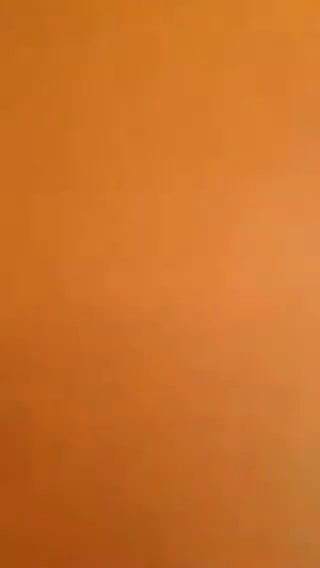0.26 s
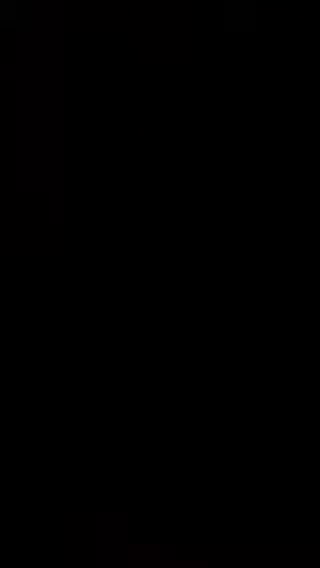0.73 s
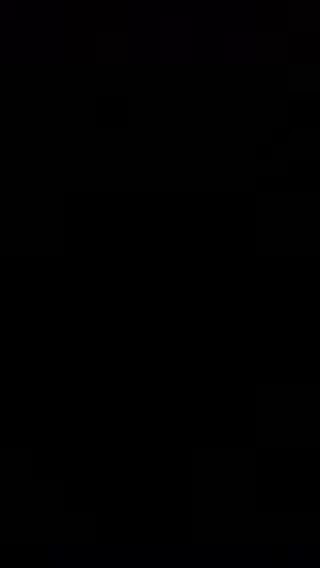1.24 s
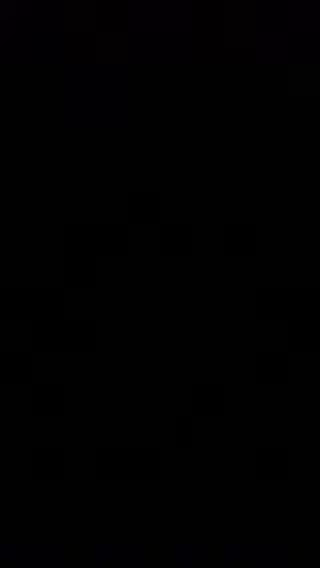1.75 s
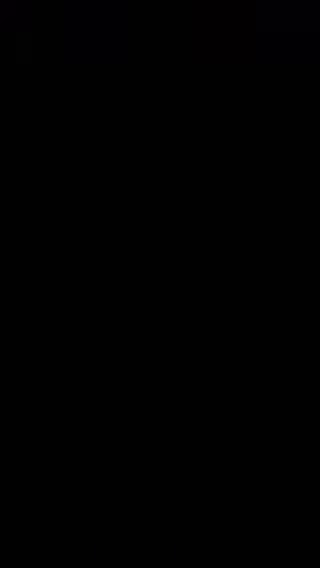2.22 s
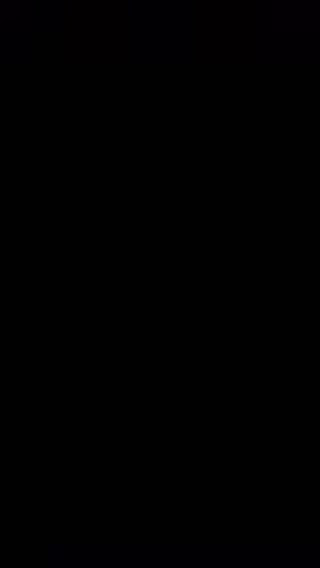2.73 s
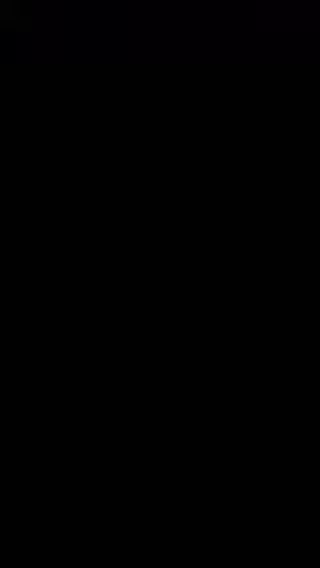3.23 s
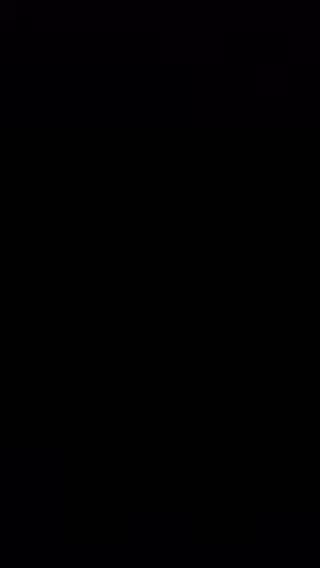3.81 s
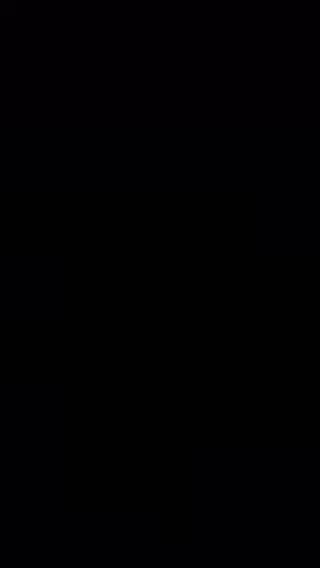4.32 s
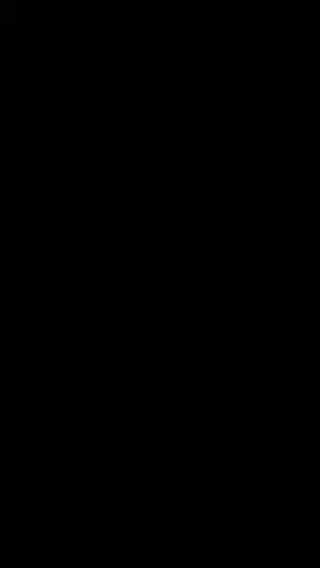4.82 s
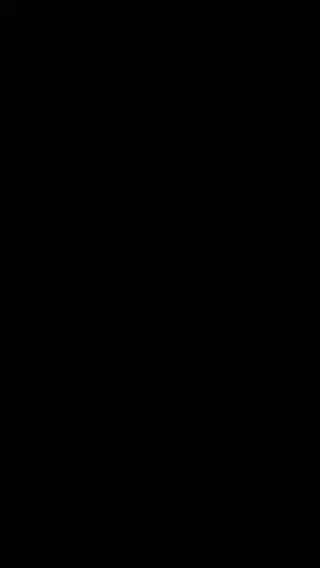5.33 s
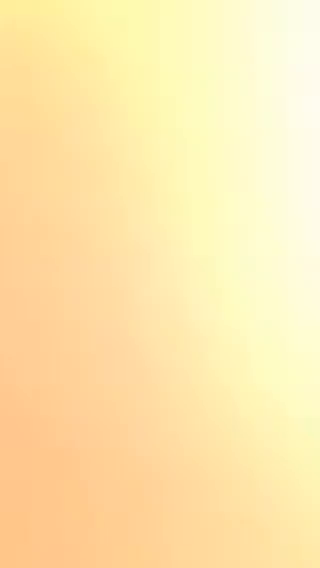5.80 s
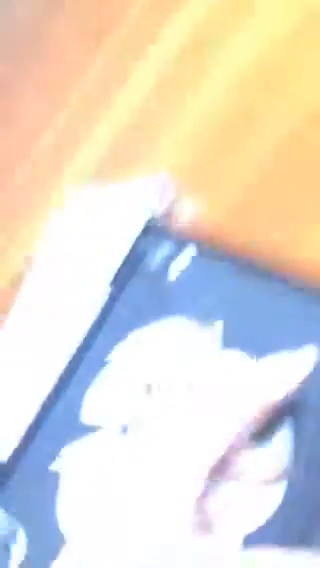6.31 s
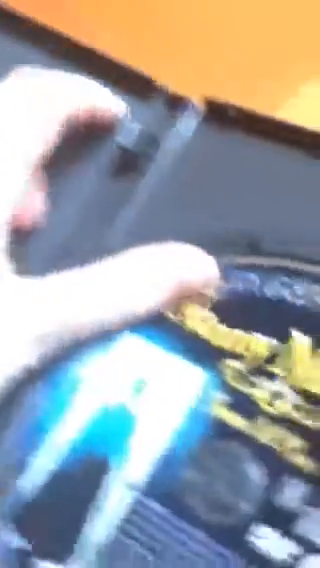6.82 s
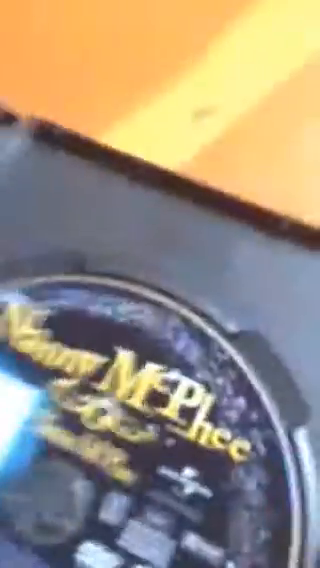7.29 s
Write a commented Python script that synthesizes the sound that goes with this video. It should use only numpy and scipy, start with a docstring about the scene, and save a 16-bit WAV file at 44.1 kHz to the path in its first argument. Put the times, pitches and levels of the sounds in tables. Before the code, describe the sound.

Very close to the microphone in a small, dry room, hands work at a thin plastic case on a wooden table. Two hard snaps come early, then crackling sleeve and lid knocks, a short edge squeak, and a loud pop followed by busy clatter. A dull grip rumble near the end leads into faint rustling and tiny clicks.

```python
"""In a small room a phone is laid face down on a wooden table; hands wrestle a thin plastic case open.
Lids knock and clasps snap (noise bursts into damped modes), the sleeve crackles, fingers drag over
plastic and wood (grainy noise), a lid edge squeals; then the phone is picked up again (dull rumble).
The room answers with fading noise tails; the microphone hisses and drops the deep bass."""
import sys
import numpy as np
from scipy import signal
from scipy.fft import rfft, irfft, next_fast_len
from scipy.io import wavfile
from scipy.ndimage import uniform_filter1d

SR = 44100
rng = np.random.default_rng(int(sys.argv[2]) if len(sys.argv) > 2 else 0)


def dump(signal):
    """Clip the signal to [-1, 1] and save it as 16-bit WAV at the path in sys.argv[1]."""
    limited = np.clip(np.atleast_2d(signal).T, -1, 1)
    pcm = np.round(limited * 32767).astype(np.int16)
    wavfile.write(sys.argv[1], SR, pcm)


N = 332955


def amp(db):
    """Decibels to amplitude."""
    return 10 ** (np.asarray(db) / 20)


def unit(x):
    """Scale to RMS 1."""
    return x / np.sqrt(np.mean(x ** 2) + 1e-20)


def peak(x):
    """Scale to peak 1."""
    return x / np.max(np.abs(x))


def along(points, hz):
    """Interpolate (f/Hz, value) points on a log frequency axis."""
    f, v = np.transpose(points)
    return np.interp(np.log(hz + 1), np.log(f + 1), v)


def filtered(x, response):
    """Apply a complex response of frequency, zero-padded."""
    m = next_fast_len(x.shape[-1] + 8192)
    spectrum = rfft(x, m) * response(np.fft.rfftfreq(m, 1 / SR))
    return irfft(spectrum, m)[..., :x.shape[-1]]


def modes(table, scatter_db=0):
    """Causal response of damped modes of alternating sign; scatter_db varies their gains per call."""
    gains = amp(scatter_db * rng.standard_normal(len(table)))

    def response(f):
        total = 0
        for k, (gain, (centre, width, db)) in enumerate(zip(gains, table)):
            resonance = 1j * f * width / (centre * centre - f * f + 1j * f * width)
            total = total + (-1) ** k * gain * amp(db) * resonance
        return total
    return response


def stick_slip(rate, spread_db):
    """Friction noise whose level wanders between uneven grains, rate per second."""
    knots = np.minimum(rng.exponential(size=int(N * rate / SR) + 4), 3.5)
    size_db = spread_db * np.interp(np.arange(N) * rate / SR, np.arange(len(knots)), knots)
    return rng.standard_normal(N) * amp(size_db)


def patchy(x, depth_db):
    """The colour shifts as the fingers move from spot to spot; RMS 1."""
    z = signal.stft(x, nperseg=256)[2]
    field = uniform_filter1d(rng.standard_normal(z.shape), size=6, axis=0)
    field = uniform_filter1d(field, size=12, axis=1)
    return unit(signal.istft(z * amp(depth_db * unit(field)), nperseg=256)[1][:N])


def held(rows, rise_db_per_s, fall_db_per_s):
    """Gains, one per level column: each row swells, holds and fades; rows add in power."""
    power, t = 1e-14, np.arange(0, N + 16, 16) / SR
    for s, length, *db in rows:
        before = rise_db_per_s * np.maximum(s - t, 0)
        after = fall_db_per_s * np.maximum(t - s - length, 0)
        power = power + np.outer(amp(db), amp(-before - after)) ** 2
    return np.array([np.interp(np.arange(N) / SR, t, gain) for gain in np.sqrt(power)])


# decay of the small room: f/Hz, t60/s
ROOM = [(150, 0.18), (600, 0.036), (3000, 0.022), (12000, 0.12)]


def room(x):
    """Noise tails, each frequency dying at its own speed; a new tail every third of a second."""
    out, step = np.zeros(N + SR), SR // 3
    for start in range(0, N, step):
        hz, t, z = signal.stft(rng.standard_normal(step), SR, nperseg=256)
        decay = amp(-60 * t / along(ROOM, hz)[:, None])
        tail = signal.istft(z * decay, SR, nperseg=256)[1]
        wet = signal.fftconvolve(x[start:start + step], tail / np.linalg.norm(tail))
        out[start + 220:][:len(wet)] += wet  # 5 ms delay
    return out[:N]


# phone gripped, laid down and picked up: t/s, held/s, level/dB
GRIP = [(.19, 0.068, -57), (5.812, 0.082, -43)]
GRIP_SLOPE_DB_PER_S = 1100


def grip():
    """Dull rumble: noise through the phone body's 140 Hz resonance, twice."""
    level, = held(GRIP, GRIP_SLOPE_DB_PER_S, GRIP_SLOPE_DB_PER_S)
    body = modes([(140.0, 81, 0)])
    return level * unit(filtered(rng.standard_normal(N), lambda hz: body(hz) ** 2))


STROKE_RISE_DB_PER_S, STROKE_FALL_DB_PER_S = 349, 247
# dry fingertips over the glossy sleeve: t/s, held/s, level/dB
SWISHES = [(0, 0.013, -64.5), (.96, 0.018, -68.5), (1.05, 0.027, -55.5), (1.82, 0.024, -70),
           (2.2, 0.05, -64), (2.46, 0.0384, -74.5), (2.99, 0.038, -63), (3.14, 0.028, -67),
           (3.41, 0.057, -57.5), (3.77, 0.088, -64.5), (4.26, 0.034, -63), (4.52, 0.42, -63.5),
           (4.93, 0.14, -54.5), (5.15, 0.087, -56.5), (5.54, 0.04, -67.5), (5.74, 0.07, -62.5),
           (5.88, 0.036, -63.5), (7.48, 0.1, -68)]
# swish spectrum: f/Hz, relative density/dB
SWISH = [(6000, -37.5), (9500, -11.5), (11500, 3), (15300, -2)]


def swish():
    """Fine, smooth friction: patchy treble noise."""
    level, = held(SWISHES, STROKE_RISE_DB_PER_S, STROKE_FALL_DB_PER_S)
    friction = filtered(rng.standard_normal(N), lambda hz: amp(along(SWISH, hz)))
    return level * patchy(friction, depth_db=-2.0)


# lid edge pushed along the table: t/s, held/s, level/dB
SQUEAL = [(3.757, 0.0606, -39.5)]
# edge resonances: f/Hz, width/Hz, relative level/dB
SQUEAL_MODES = [(670, 32, -5), (1182, 66, 5.5), (1590, 42, -8), (3037, 47, -3.5)]
SQUEAL_SLOPE_DB_PER_S = 895


def squeal():
    """Fast slips excite a few narrow resonances of the edge."""
    level, = held(SQUEAL, SQUEAL_SLOPE_DB_PER_S, SQUEAL_SLOPE_DB_PER_S)
    return level * unit(filtered(stick_slip(rate=200, spread_db=-3.0), modes(SQUEAL_MODES)))


# free span of the lids, changing with the grip: t/s, f/Hz
SPAN = [(.6, 342.3), (1.1, 563), (1.45, 422.5), (2.4, 398.6), (2.85, 345.6), (3.15, 306.7), (3.4, 303.7),
        (3.47, 499), (3.6, 388), (3.79, 648), (4.6, 436), (4.85, 546), (5.2, 495), (5.8, 257.5), (6.2, 405),
        (6.52, 606), (6.59, 782), (7.4, 253)]
SPAN_DB_PER_OCTAVE = 12


def favour(x):
    """Lid sound nearest the pitch of the free span dominates; short-term power is evened out."""
    hz, t, z = signal.stft(x, SR, nperseg=1024)
    span_hz = np.interp(t, *np.transpose(SPAN))
    octaves_away = np.abs(np.log2((hz[:, None] + 1) / span_hz))
    z = z * amp(-SPAN_DB_PER_OCTAVE * octaves_away)
    power = uniform_filter1d(np.sum(np.abs(z) ** 2, axis=0), size=40)
    return signal.istft(z / np.sqrt(power), SR, nperseg=1024)[1][:N]


# hand strokes over case and table: t/s, held/s, lid drumming/dB, sleeve rustle/dB, skin hiss/dB
STROKES = [(0, 0.007, -52.5, -52, -53.5), (.46, 0.046, -59, -74, -72), (.56, 0.079, -42.5, -56.5, -63.5),
           (.8, 0.079, -57, -58, -64), (.92, 0.054, -60, -51, -55), (1.02, 0.064, -55, -53.5, -54),
           (1.099, 0.035, -48, -50.5, -62.5), (1.22, 0.069, -66, -67, -80), (1.385, 0.061, -51, -49, -58),
           (1.445, 0.04, -42, -48, -59.5), (1.53, 0.062, -48.5, -51, -68.5),
           (1.62, 0.14, -57.5, -58, -66.5), (1.813, 0.0098, -57, -47.5, -58),
           (1.89, 0.045, -58, -56, -60.5), (2, 0.12, -63, -57.5, -64), (2.178, 0.11, -66, -61, -59.5),
           (2.346, 0.13, -59, -48.5, -58), (2.52, 0.15, -65.5, -56.5, -62.5),
           (2.748, 0.053, -43.5, -50, -64.5), (2.835, 0.019, -34, -54, -60),
           (2.976, 0.082, -54, -60, -62.5), (3.124, 0.064, -50.5, -60.5, -65),
           (3.32, 0.076, -59.5, -65.5, -79), (3.4, 0.069, -35, -46.5, -52.5),
           (3.56, 0.18, -54.5, -58.5, -63), (3.775, 0.057, -42, -46.5, -54),
           (3.83, 0.024, -44, -44.5, -55.5), (3.93, 0.074, -61.5, -56, -62.5), (4.06, 0.031, -62, -82, -74),
           (4.151, 0.036, -54.5, -62.5, -68), (4.25, 0.047, -46, -55.5, -62.5),
           (4.348, 0.049, -42.5, -41.5, -52.5), (4.45, 0.073, -56, -73, -89), (4.54, 0.084, -39, -43, -54),
           (4.671, 0.051, -40, -44, -54.5), (4.745, 0.033, -44.5, -71, -60.5),
           (4.79, 0.11, -42.5, -52.5, -54.5), (4.95, .12, -53, -49.5, -48.5), (5.12, .14, -53, -54.5, -52),
           (5.341, 0.14, -67.5, -65.5, -65.5), (5.52, 0.1, -75, -69.5, -63.5),
           (5.739, 0.041, -55, -51, -48.5), (5.85, 0.012, -41.5, -47.5, -52.5),
           (6.039, 0.0083, -59.5, -80.5, -84), (6.179, 0.0074, -53, -56.5, -67.5),
           (6.25, 0.059, -78, -55, -61), (6.37, 0.07, -64.5, -58, -65), (6.498, 0.021, -55.5, -60, -67.5),
           (6.566, 0.023, -54.5, -58, -67), (6.66, 0.18, -72.5, -66, -70), (6.939, 0.1, -75.5, -68.5, -74),
           (7.079, 0.26, -79, -77, -66), (7.33, 0.19, -68, -64, -69), (7.48, 0.047, -63, -57.5, -61)]
DRUM_RISE_DB_PER_S, DRUM_FALL_DB_PER_S = 646.5, 417
HEAVY_DB = -26  # blows above this clatter on
CLATTER_LID_DB = -23  # re blow level + thud column
CLATTER_SLEEVE_DB, CLATTER_SKIN_DB = -21.5, -26.5  # re blow level
CLATTER_RISE_DB_PER_S, CLATTER_FADE_DB_PER_S, SHELL_FADE_DB_PER_S = 8004.5, 349, 799.5


def handling():
    """Gains of lids, sleeve and skin: strokes, plus the fading clatter of each heavy blow."""
    heavy = [row for row in CONTACTS if row[1] > HEAVY_DB]
    low = [(s, 0, db + thud_db + CLATTER_LID_DB) for s, db, thud_db, *_ in heavy]
    high = [(s, 0, db + CLATTER_SLEEVE_DB, db + CLATTER_SKIN_DB) for s, db, *_ in heavy]
    lid_clatter = held(low, CLATTER_RISE_DB_PER_S, CLATTER_FADE_DB_PER_S)
    shell_clatter = held(high, CLATTER_RISE_DB_PER_S, SHELL_FADE_DB_PER_S)
    drumming = held([row[:3] for row in STROKES], DRUM_RISE_DB_PER_S, DRUM_FALL_DB_PER_S)
    rustle = held([row[:2] + row[3:] for row in STROKES], STROKE_RISE_DB_PER_S, STROKE_FALL_DB_PER_S)
    return np.hypot(np.vstack([drumming, rustle]), np.vstack([lid_clatter, shell_clatter]))


# sleeve crinkle spectrum: f/Hz, relative density/dB
SLEEVE = [(410, -30.5), (700, -3.5), (1350, -1), (2360, -4.5), (3090, -8.5), (3400, -7), (7000, -24),
          (9100, -53), (15400, -120)]
# skin friction spectrum: f/Hz, relative density/dB
SKIN = [(1760, -23.5), (3000, -5), (4920, 0.5), (5380, -5), (9260, -3.5), (15500, -32)]


def dragging(drumming, rustle, hiss):
    """Sliding drums the lids, crinkles the sleeve and hisses under the skin."""
    lids = favour(filtered(stick_slip(rate=130, spread_db=1.5), modes(LIDS)))
    shell_ring = modes(WALLS + CLASP)
    sleeve = filtered(stick_slip(rate=500, spread_db=4.1),
                      lambda hz: amp(along(SLEEVE, hz)) * (1 + 0.022 * shell_ring(hz)))
    skin = filtered(stick_slip(rate=1100, spread_db=2.5), lambda hz: amp(along(SKIN, hz)))
    return (drumming * patchy(lids, depth_db=2.5)
            + rustle * patchy(sleeve, depth_db=4.5)
            + hiss * patchy(skin, depth_db=2.0))


def crack(ms, slip):
    """Splintery noise force swelling to its height at ms, then dying; one sharp slip at the height."""
    u = np.arange(SR // 8) / SR / (np.clip(ms, .2, 12) / 1000)
    force = rng.standard_normal(len(u)) * (u * np.exp(-u) + 0.055 * np.exp(-u / 12))
    force[int(len(u) / u[-1])] += slip * np.sqrt(ms)
    return force


# broad lid bending modes: f/Hz, width/Hz, relative level/dB
LIDS = [(160, 300, -0.5), (309, 226, 7), (429, 390, 5), (686, 475, 2.5), (833, 730, -11)]
LID_TOP_HZ = 2110


def bend(force):
    """The force bends the broad lids, too heavy to follow its treble; peak 1."""
    lids = modes(LIDS, scatter_db=3)

    def response(hz):
        return lids(hz) * 1j * hz / (1j * hz + 170) / (1 + 1j * hz / LID_TOP_HZ) ** 3
    return peak(filtered(force, response))


# stiff wall modes: f/Hz, width/Hz, relative level/dB
WALLS = [(880, 400, 0), (1080, 350, 0), (1450, 450, -6), (1900, 450, -6)]
# clasp modes: f/Hz, width/Hz, relative level/dB
CLASP = [(2470, 700, -4), (3150, 700, 0), (3810, 700, -2), (4790, 1000, -3), (5700, 1100, -4)]
# thin edge modes: f/Hz, width/Hz, relative level/dB
EDGES = [(6520, 1300, -1), (7970, 1500, 0), (9400, 1800, -3), (11200, 2000, -8), (13700, 2200, -9)]
SPOT_WIDTH_HZ, SPOT_DB = 450, 3  # nearest clasp mode takes the spot's pitch, rings longer


def shell(force, knock_db, edge_db, clasp_hz):
    """The force rings walls, clasp (peak 1) and edges; clasp modes near the struck spot ring most."""
    def ring(table):
        return peak(filtered(force, modes(table, scatter_db=2)))

    clasp = [(hz, width, db - 9 * abs(np.log2(hz / clasp_hz))) for hz, width, db in CLASP]
    nearest = np.argmin([abs(hz - clasp_hz) for hz, *_ in CLASP])
    clasp[nearest] = (clasp_hz, SPOT_WIDTH_HZ, SPOT_DB)
    snap = peak(filtered(ring(clasp), lambda hz: 1 / (1 + 1j * hz / 7000) ** 2))
    return amp(knock_db + 3.5) * ring(WALLS) + snap + amp(edge_db + 6.0) * ring(EDGES)


# sleeve crackles and small clicks: t/s, clasp-ring peak level/dB, knock trim/dB, edge trim/dB
CRACKLES = [(0.341, -50, -7.5, -37.5), (0.5362, -37.5, -7, -30.5), (0.556, -45, -12, 2),
            (0.5655, -43, 1.5, -5), (0.634, -41, -4.5, -24), (0.6687, -47, 3, -10),
            (0.9328, -36.5, -10, -6), (0.9743, -41.5, -4, -3), (1.0183, -34.5, -14.5, -6),
            (1.1323, -34, 0, -12.5), (1.1693, -37, -6.5, -13), (1.267, -50.5, -3, -11),
            (1.4742, -32, -22, -13.5), (1.5404, -27, -20.5, -13.5), (1.561, -39.5, -15, -24),
            (1.6144, -35, -25, -37), (1.6642, -28.5, -9.5, -40.5), (1.6789, -28, -12.5, -36.5),
            (1.719, -38, -6.5, -27), (1.7491, -39.5, -17, -7), (1.807, -30, -9, -12.5),
            (1.871, -35, -5, -14.5), (1.8879, -39, -9, -30.5), (1.9131, -37, -26, -12),
            (2.0018, -31.5, -8, -18.5), (2.1001, -39.5, -6, -24), (2.295, -41.5, 1.5, -30.5),
            (2.303, -41, -4.5, -30), (2.337, -30.5, 0, -16), (2.3429, -26, -10.5, -20.5),
            (2.355, -39, -9, -20), (2.37, -33, -2, -18), (2.383, -41.5, -12.5, -21),
            (2.391, -32.5, -5, -37.5), (2.416, -40, -36, -28.5), (2.4485, -31, -11.5, -23.5),
            (2.467, -35.5, -18.5, -22), (2.5608, -38, -13.5, -28.5), (2.6467, -41, -11, -21),
            (3.1732, -60, 13, -14.5), (3.2972, -62, 10.5, -19.5), (3.3554, -44, -8, -18.5),
            (3.547, -33, -0.5, -48), (3.8469, -41.5, 0.5, -26), (3.918, -27.5, -7.5, -1.5),
            (3.924, -39, 6, -4.5), (4.0095, -50, 4.5, -21), (4.334, -26.5, -5.5, -15.5),
            (4.3723, -34.5, -10, -7.5), (4.3988, -37, -5.5, -9.5), (4.5228, -25.5, -5, -27),
            (4.5974, -33.5, 0, 0.5), (4.6237, -31, -43, -7.5), (4.679, -32.5, -15, 0),
            (4.6986, -26.5, -14, -6), (5.009, -32.5, -15.5, -9.5), (5.099, -24, -16.5, -14),
            (5.131, -34.5, -9, 1), (5.3498, -55.5, 10, -18.5), (5.4431, -39, -7.5, -11),
            (5.6898, -33.5, -12, -21.5), (5.705, -41.5, -4.5, -7.5), (5.871, -26.5, -4, -22.5),
            (5.8785, -26, -8, -18), (6.1847, -52, 3.5, 1), (6.209, -45.5, -8.5, -10.5),
            (7.2403, -35.5, -2.5, 3), (7.2553, -49, -25, -3.5), (7.2734, -43, -9.5, -21.5)]
CRACKLE_MS, CRACKLE_MS_OCTAVES, CRACKLE_SLIP = 1.5, .3, 3.2  # median rise, its scatter, slip


def crackles():
    """Each crackle is a small splintery force at a random spot, ringing shell and lids."""
    out = np.zeros(N + SR)
    for s, db, knock_db, edge_db in CRACKLES:
        force = crack(CRACKLE_MS * 2 ** rng.normal(0, CRACKLE_MS_OCTAVES), CRACKLE_SLIP)
        spot_hz = 3250 * 2 ** rng.normal(0, 0.17)
        sound = shell(force, knock_db, edge_db, spot_hz) + amp(knock_db + 3.0) * bend(force)
        out[round(s * SR):][:len(sound)] += amp(db) * sound
    return out[:N]


# lid and clasp blows: t/s, clasp-ring peak level/dB, thud, knock and edge trims/dB, thud f/Hz, clasp f/Hz
CONTACTS = [(0.432, -48.5, 17, -1, -11, 443, 2940), (0.5458, -26.5, -9, -7.5, -14, 280, 2280),
            (0.7421, -14.5, 5, -8.5, -1.5, 494, 4300), (0.7493, -24, -6.5, -29, -15.5, 356, 3105),
            (0.762, -39.5, 1.5, 3, -12, 300, 2560), (0.8702, -42.5, 5.5, 3, -4, 257, 2490),
            (0.881, -7, -6, -11.5, -1.5, 267, 2422), (0.893, -34, 12, -13, -16.5, 187, 2910),
            (1.3495, -28.5, 3.5, -7, -7.5, 657, 2500), (1.3534, -13.5, -17, -11, -10, 181, 3920),
            (1.376, -18.5, -15.5, -16, -14, 566, 3820), (1.4191, -23.5, 9.5, 9, -8, 396, 2300),
            (1.4217, -25.5, 5.5, -2.5, -29.5, 370, 2940), (2.6988, -15, -0.5, -5, -18, 394, 3810),
            (2.7077, -17.5, -3.5, -7, -11.5, 410, 3260), (2.8053, -36.5, -1, 3.5, -43.5, 328, 3750),
            (2.8632, -38.5, -14, 3, -42.5, 350, 3500), (2.9683, -41.5, 3, -13, -9, 427, 3860),
            (2.973, -56, 19.5, -9, -20, 376, 3020), (3.337, -55.5, 16, -9, -27, 304, 3600),
            (3.4924, -50, 22, -5, -5.5, 322, 2240), (3.704, -34, 3, -5.5, -19, 453, 2450),
            (3.831, -41.5, 13, -1, -19, 315, 3000), (4.3051, -5, -6, -11, -21, 957, 3181),
            (4.3097, -27.5, 6.5, 11, -22, 630, 2270), (4.3112, -17, -4.5, 1.5, -5, 403, 2850),
            (4.3139, -11.5, -11.5, -10, -12, 178, 1852), (4.5053, -21, 4.5, 3.5, -19, 420, 2230),
            (4.6694, -20.5, -7.5, -8, -15, 735, 3170), (4.7017, -17, -11, -26.5, -13, 260, 3070),
            (4.721, -22, -9.5, -13, -14, 204, 3220), (4.974, -49.5, 16, -19, -18, 437, 3400),
            (5.048, -55, 11, -7, -16, 355, 3000), (5.064, -40.5, 6, -25, 1.5, 310, 4930),
            (5.7586, -51, 11, -10, -5.5, 337, 3690), (5.8071, -34.5, -3, -10, -17, 500, 3020),
            (5.891, -21.5, -10, -8.5, -36, 624, 2310), (6.0336, -65, 18.5, 9, 3, 511, 2220),
            (7.249, -67, 18, -9.5, -22, 167, 2492), (7.3157, -46, 0, 4, -28, 188, 2280),
            (7.4006, -59, 15, -5, -2, 169, 4500)]
BLOW_MS, BLOW_SLIP = .8, 7  # force rise and slip of a blow at FIRM_DB
FIRM_DB, SOFTEN, SOFT_MS = -16, .4, 1.4  # weaker blows rise slower, up to SOFT_MS, and slip less


def contacts():
    """Each blow is a crack through the shell and a low push that bends the lid against the table."""
    out, t = np.zeros(N + SR), np.arange(SR // 8) / SR
    for s, db, thud_db, knock_db, edge_db, thud_hz, clasp_hz in CONTACTS:
        ms = min(BLOW_MS * amp(SOFTEN * (FIRM_DB - db)), SOFT_MS)
        force = crack(ms, BLOW_SLIP * (BLOW_MS / ms) ** 2)
        cycles = thud_hz * np.maximum(t - BLOW_MS / 1000, 0)
        swing = cycles * np.exp(-cycles / 0.31) + 0.015 * amp(-60 * t / 0.043)
        push = -np.sin(2 * np.pi * cycles) * swing
        # a small lid radiates little below its pitch
        push = filtered(push, lambda hz: (1j * hz / (1j * hz + thud_hz / 2)) ** 2)
        thud = peak(peak(push) + 0.64 * bend(force))
        sound = shell(force, knock_db, edge_db, clasp_hz) + amp(thud_db + 6.5) * thud
        out[round(s * SR):][:len(t)] += amp(db) * sound
    return out[:N]


def scene():
    """Sum all sources; only blows and crackles feed the room."""
    near = crackles() + contacts()
    friction = dragging(*handling()) + swish() + squeal()
    return (amp(-13.5) * room(near) + grip() + friction + near)[None]


# microphone hiss spectrum: f/Hz, relative density/dB
HISS = [(24, -57), (40, -28), (150, 10.5), (266, 0.5), (407, -14), (591, -7), (4460, -15), (14400, -22),
        (15500, -23.5)]
HISS_DB = -67  # RMS before the bass cut
SHELF_HZ, TOP_HZ = 15300, 16500


def record(dry):
    """Microphone hiss, bass cut, rounded peaks; the sound is dull above 15.3 kHz and ends at 16.5 kHz."""
    hiss = amp(HISS_DB) * unit(filtered(rng.standard_normal(N), lambda hz: amp(along(HISS, hz))))
    thin = filtered(dry + hiss, lambda hz: (1j * hz / (1j * hz + 80)) ** 3)
    rounded = thin / (1 + np.abs(thin / .75) ** 6) ** (1 / 6)
    return filtered(rounded, lambda hz: np.where(hz > SHELF_HZ, amp(-25), 1) * (hz < TOP_HZ))


dry = scene()
out = record(dry)
dump(out)
```